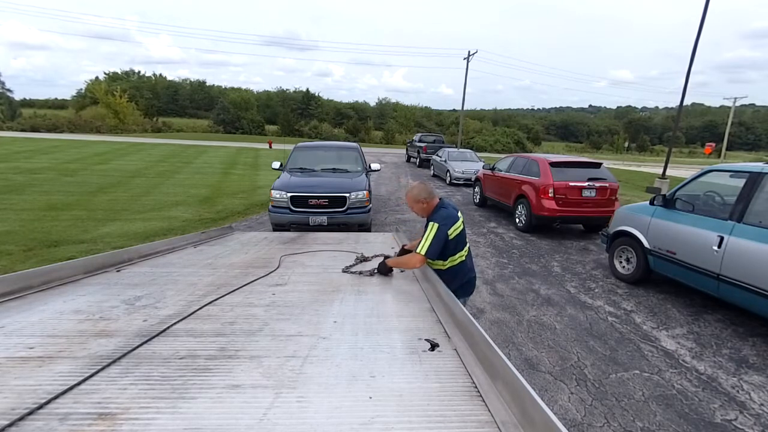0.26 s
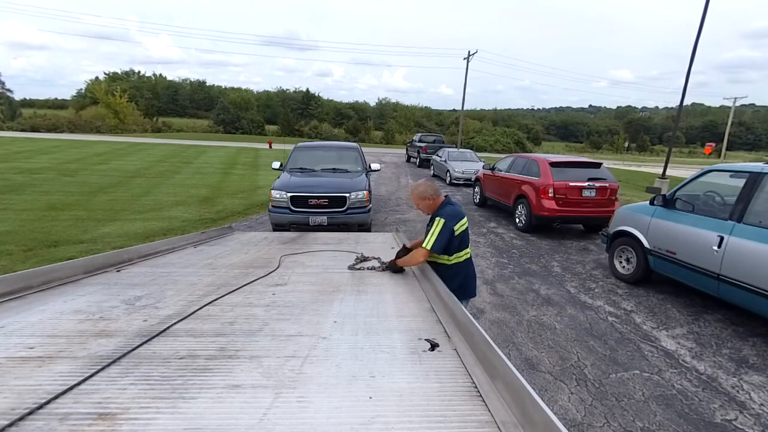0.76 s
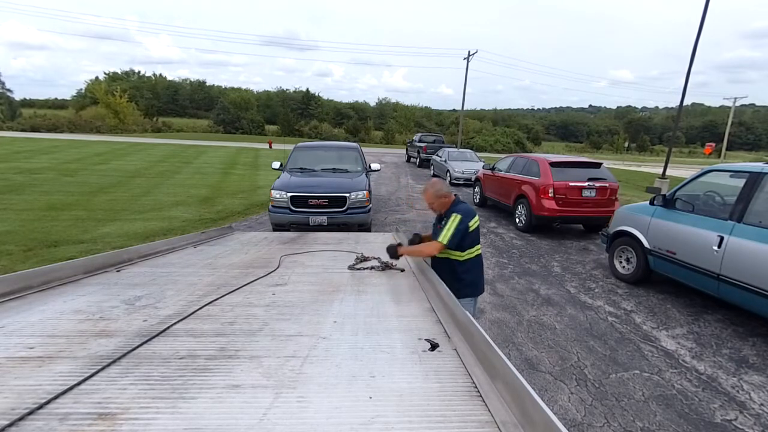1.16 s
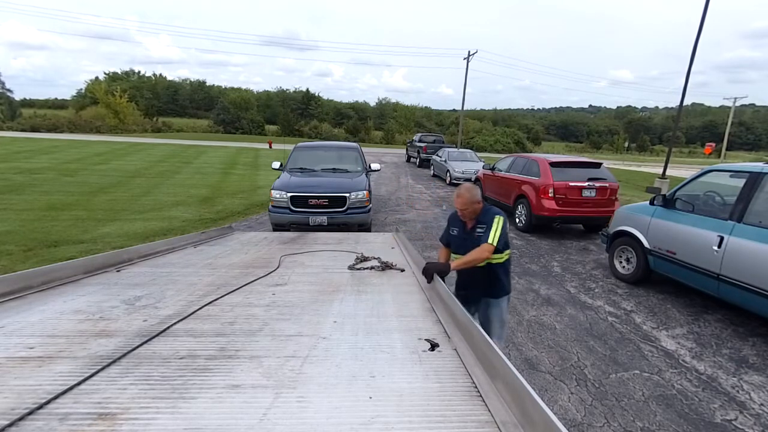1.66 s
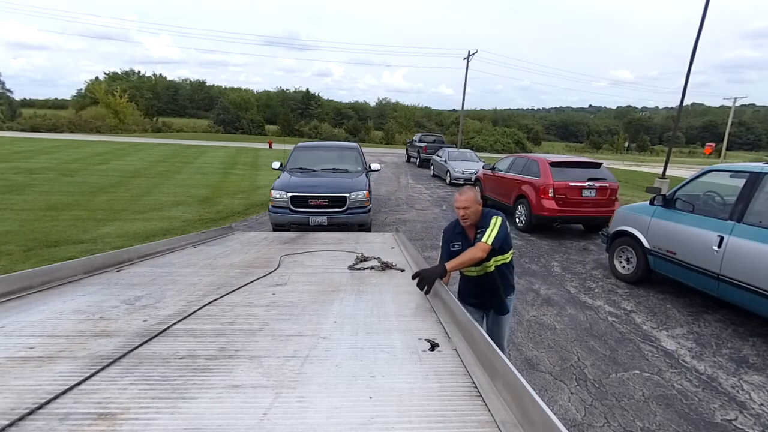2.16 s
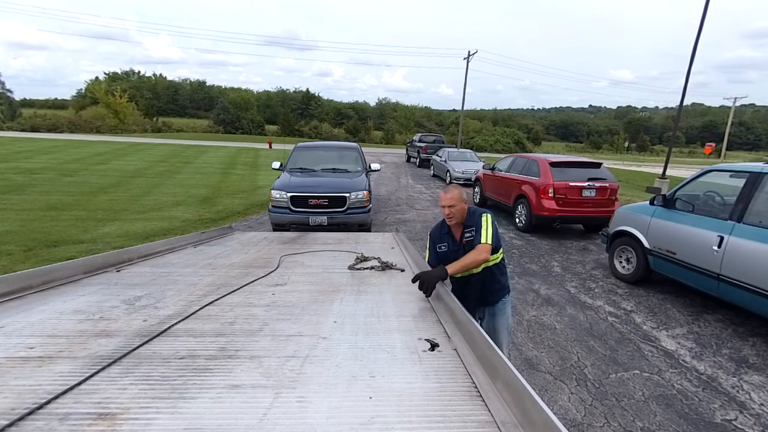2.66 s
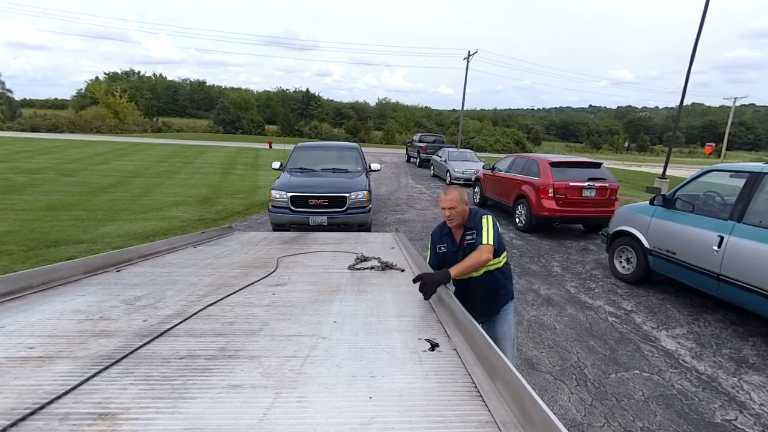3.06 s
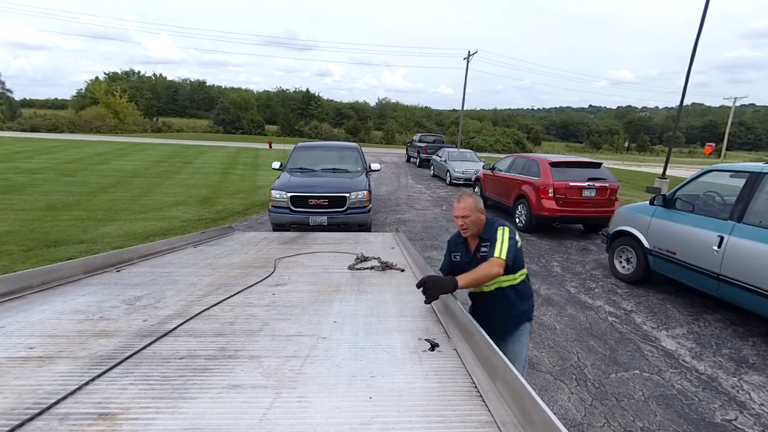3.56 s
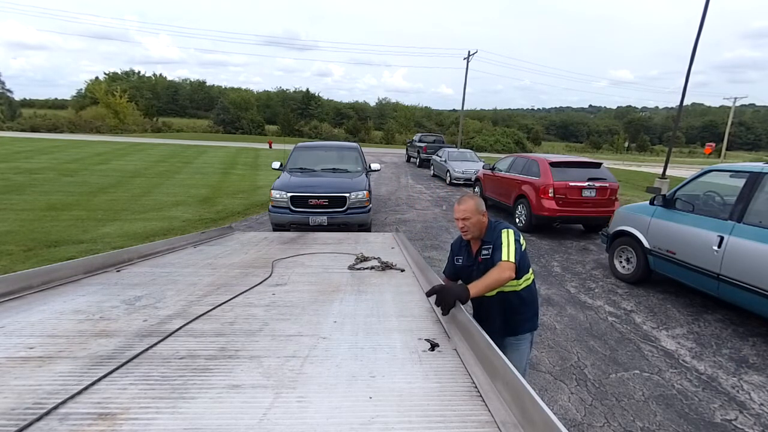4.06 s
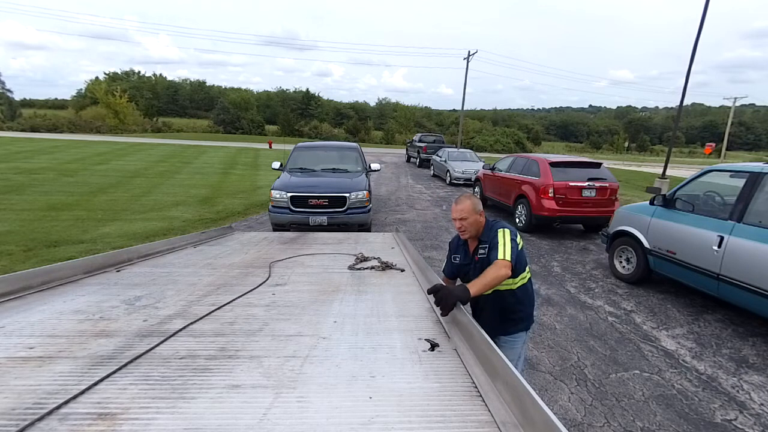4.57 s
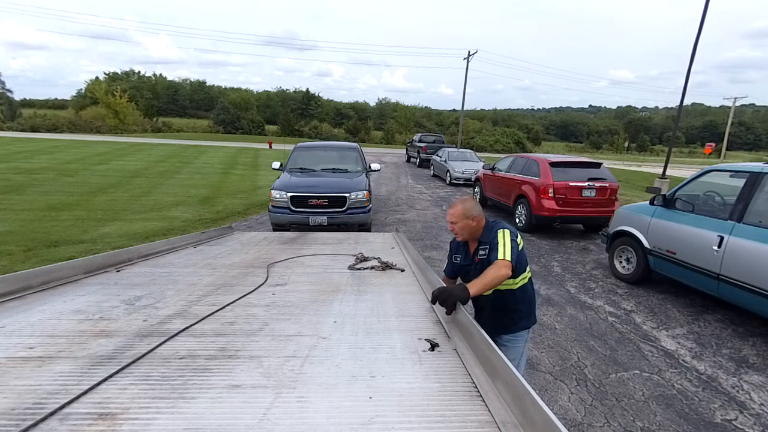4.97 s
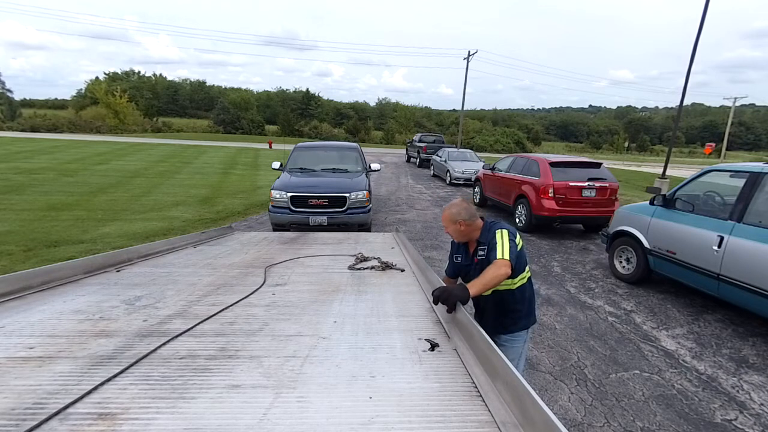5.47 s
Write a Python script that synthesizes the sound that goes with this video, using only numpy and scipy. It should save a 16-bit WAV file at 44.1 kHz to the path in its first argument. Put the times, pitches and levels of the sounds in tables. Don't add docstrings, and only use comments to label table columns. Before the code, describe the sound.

Chain links scrape and knock on ringing metal plate, a faint idle follows, then a grinding, whining winch drags cable that snags over ribs.

```python
import sys
import numpy as np
from scipy import signal
from scipy.fft import rfft, irfft, next_fast_len
from scipy.io import wavfile
from scipy.ndimage import uniform_filter1d, map_coordinates

SR = 44100
rng = np.random.default_rng(int(sys.argv[2]) if len(sys.argv) > 2 else 0)


def undo_db(level):
    steps = np.asarray(level, float) / 20
    return 10 ** steps


def log_audio(samples):
    frames = np.atleast_2d(samples).T
    limited = np.clip(frames, -1, 1)
    pcm = np.round(limited * 32767).astype(np.int16)
    wavfile.write(sys.argv[1], SR, pcm)


N = 251811
TIME = np.arange(N) / SR


def unit(x):
    return x / np.sqrt(np.mean(x ** 2) + 1e-20)


def along(points, hz):
    f, db = np.transpose(points)
    return undo_db(np.interp(np.log(hz + 1), np.log(f + 1), db, left=-120, right=-120))


def curves(rows):
    s, *columns = np.transpose(rows)
    return [np.interp(TIME, s, column) for column in columns]


def wobble(rate):
    knots = rng.standard_normal(int(N * rate / SR) + 4)
    return map_coordinates(knots, [np.arange(N) * rate / SR])


def filtered(x, response):
    m = next_fast_len(N + SR // 2)
    return irfft(rfft(x, m) * response(np.fft.rfftfreq(m, 1 / SR)), m)[:N]


def noise_through(response):
    return filtered(rng.standard_normal(N), response)


def hump(hz, spread):
    return lambda f: np.exp(-np.log((f + 1) / hz) ** 2 / spread)


def resonant(modes, f):
    total = 0
    for k, (centre, width, db) in enumerate(modes):
        damping = 1j * f * width
        total = total + (-1) ** k * undo_db(db) * damping / (centre * centre - f * f + damping)
    return total


def fine_modes(f, spacing_hz, depth_db):
    ripple = rng.standard_normal(int(SR / 2 / spacing_hz) + 4)
    return undo_db(depth_db * map_coordinates(ripple, [f / spacing_hz]))


def grit(per_s, spread_db, smooth):
    sizes = undo_db(spread_db * rng.uniform(-1.2, 1, N)) * np.sign(rng.standard_normal(N))
    contacts = (rng.random(N) < per_s / SR) * sizes
    return unit(unit(contacts) + smooth * rng.standard_normal(N))


def add(track, s, sound):
    part = track[round(s * SR):][:len(sound)]
    part += sound[:len(part)]


# time in seconds, gear noise level in dB.
EFFORT_CURVE = [
    (2.46, -66),
    (2.5, -53.5),
    (2.55, -40.5),
    (2.75, -39),
    (3.1, -42.5),
    (3.5, -42.5),
    (4.75, -42),
    (5.2, -39.5),
    (5.71, -39.5),
]


def winch():
    lines, turns = whine()
    gears_db, = curves(EFFORT_CURVE)
    grinding = undo_db(gears_db + 0.21 * wobble(9.5)) * gears(turns)
    running = np.arange(N) > EFFORT_CURVE[0][0] * SR
    return running * (lines + grinding + cable()) + snags()


# time in seconds, pump pulses per second.
PUMP_SPEED = [(2.5, 85), (2.53, 108), (2.555, 117.5), (2.6, 117.8), (2.625, 112.8), (2.71, 112.3),
              (2.77, 108.3), (2.85, 107.5), (2.88, 99), (2.91, 95.8), (2.95, 97.6), (3, 100.65),
              (3.2, 101.45), (3.8, 104.5), (4.2, 105.65), (4.4, 106.1), (5, 107.15), (5.7, 107.45)]
# time in seconds, share from 0 to 1.
CABLE_TENSION = [
    (4.74, 0.07),
    (4.88, 1),
]
START_ORDERS = [13 / 6, 7, 9, 31 / 3, 15, 15, 15, 8, 28, 34, 35]
# speed in pulses/s, width in pulses/s, level in dB.
START_CROSSINGS = [(93.6, 3, -58), (117.1, 2.6, -50.5), (117.5, 1.5, -49.5), (95.5, 3, -53),
                   (119, 0.91, -43.5), (112.5, 0.95, -45), (107.6, 0.21, -51), (113, 1.2, -50.5),
                   (97.5, 0.82, -54), (98.2, 0.77, -46), (93, 0.74, -60)]
RUN_ORDERS = [1, 2, 13 / 3, 6, 7, 7, 8, 10.5, 14, 46 / 3, 19, 20, 32, 34, 57, 14, 16, 17, 18, 22, 23, 28,
              33, 34, 37, 27, 28]
# speed in pulses/s, width in pulses/s, level in dB.
RUN_CROSSINGS = [(104.4, 3.7, -74), (104.54, 2.2, -66), (101.9, 2.4, -68.5), (104.4, 2.2, -62.5),
                 (103.3, 0.41, -49), (106.8, 1.4, -59.5), (102.6, 1.17, -48), (105.7, 0.4, -50),
                 (99.2, 2.9, -49), (104.6, 0.36, -49), (107, .8, -66), (103.16, 1.8, -49),
                 (104.7, 0.35, -57), (102.3, 0.58, -53.5), (107, 1.7, -62), (104.95, 0.24, -50.5),
                 (105.8, 1.1, -55), (100.5, 0.82, -74), (102, .5, -64), (108.5, 0.12, -63.5),
                 (100, .4, -57), (112, .6, -68), (103, 0.44, -58), (102, 0.53, -67), (108.5, 0.65, -57),
                 (100.6, 1.2, -60), (101.2, 1.9, -58)]
TAUT_ORDERS = [8, 9, 12, 13, 15, 16.5, 52 / 3, 22, 67 / 3, 27, 29, 50, 56, 63]
# speed in pulses/s, width in pulses/s, level in dB, gain in dB once taut.
TAUT_CROSSINGS = [(107.3, 0.26, -67, 10), (113, 5, -61.5, 10.5), (107.3, 2.4, -55.5, 10),
                  (106.3, 3.3, -49, 4), (106, 2.5, -56, 16), (107, 0.58, -55.5, 13),
                  (105.5, 1.7, -51.5, 4.5), (103, 4.6, -50, -25), (105.8, 2.6, -62, 11.5),
                  (106.1, 1.7, -54.5, -18), (106.6, 0.85, -48, -0.5), (109, 1.5, -71, 11.5),
                  (106, 2.5, -68, 4), (106.3, 0.39, -56, 10.5)]


def whine():
    (speed,), (taut,) = curves(PUMP_SPEED), curves(CABLE_TENSION)
    turns = np.cumsum(speed + 0.0412 * wobble(24.91)) / SR
    lines = np.zeros(N)
    on = slice(int(PUMP_SPEED[0][0] * SR) - SR // 20, N)
    t = TIME[on]
    coarse_t, coarse_speed, coarse_taut = t[::64], speed[on][::64], taut[on][::64]
    flutter_s = np.arange(0, N / SR + 0.1, 1 / 28)
    orders = START_ORDERS + RUN_ORDERS + TAUT_ORDERS
    crossings = [(*row, 0) for row in START_CROSSINGS + RUN_CROSSINGS] + TAUT_CROSSINGS
    phase = {order: rng.random() for order in orders}
    for order, (best, width, db, taut_db) in zip(orders, crossings):
        off_peak = np.abs((coarse_speed - best) / max(width, 0.05))
        swell = 1 / np.sqrt(1 + off_peak ** 3)
        flutter = np.interp(coarse_t, flutter_s, rng.standard_normal(len(flutter_s)))
        flutter_db = min(0.09 * order, 2.5) * flutter
        level = np.interp(t, coarse_t, undo_db(db + taut_db * coarse_taut + flutter_db) * swell)
        lines[on] += np.sqrt(2) * level * np.sin(2 * np.pi * (order * turns[on] + phase[order]))
    since = TIME - 2.56
    surge_db, surge_s, rise_db_per_s = 6.5, 0.7, 563.5
    load_db = -1.4 + surge_db * np.exp(-np.abs(since) / surge_s) + rise_db_per_s * np.minimum(since, 0)
    return undo_db(load_db) * lines, turns


# resonance in Hz, width in Hz, level in dB.
HOUSING_MODES = [(808, 25.6, -10), (890, 7.6, -19), (1100, 25, 0.5), (1284, 15, 6.5), (1446, 16, -9),
                 (1690, 16, -3), (1782, 31, 3), (2055, 41, -1), (2380, 330, -15), (2850, 37, -15),
                 (3101, 27, -3.5), (3348, 83, -2.5), (3540, 30, -18), (4080, 124, -16.5),
                 (4670, 136, -11.5), (6170, 29, -13.5), (6370, 69, -24.5), (6725, 28, -8.5),
                 (7080, 40, -29), (7620, 150, -15.5), (8520, 30, -22), (9920, 70, -32), (12300, 170, -20)]
COVER_HZ = [5560, 8280, 11010, 11390]
# width in Hz, level in dB.
COVER_WIDTHS = [(89.5, -16.5), (50, -25), (69, -18), (80, -13.5)]
# frequency in Hz, level in dB per Hz.
GEAR_COLOUR = [(35, -47), (60, -47), (216, -19), (272, -25), (548, -16), (814, 1.5), (1800, 3), (2860, -11),
               (3370, -11), (5240, -12.5), (6610, -7), (8950, -25.5), (11000, -15), (15600, -53)]


def gears(turns):
    beat = 1 + 0.14 * np.cos(2 * np.pi * turns) + 0.038 * np.cos(2 * np.pi * turns / 3)
    drive = beat * grit(6000, spread_db=7, smooth=1.45) + 0.24 * strokes(turns, count=24)
    drive = filtered(drive, lambda f: fine_modes(f, spacing_hz=21.73, depth_db=3.5))
    panels = HOUSING_MODES + [(hz, *row) for hz, row in zip(COVER_HZ, COVER_WIDTHS)]
    ringing = np.zeros(N)
    for k in range(2):
        half = unit(filtered(drive, lambda f: resonant(panels[k::2], f)))
        ringing += half * undo_db(0.9 * wobble(9))
    noise = unit(ringing) + 0.84 * unit(filtered(drive, lambda f: along(GEAR_COLOUR, f)))
    spin = np.clip((TIME - 2.5) / 0.21, 0, 1)
    treble = filtered(noise, lambda f: f ** 4 / (f ** 4 + 4900.0 ** 4))
    return unit(noise - (1 - spin) * treble)


def strokes(turns, count):
    phase = np.linspace(0, 1, 4097)
    shape = np.zeros(len(phase))
    for k in range(count, 3 * count):
        shape += undo_db(4.1 * rng.standard_normal()) * np.sin(2 * np.pi * (k * phase + rng.random()))
    return unit(np.interp(turns % 1, phase, shape))


# frequency in Hz, level in dB per Hz.
CABLE_COLOUR = [(1470, -38), (2500, -13), (2700, -0.5), (3400, 1), (5030, -8.5), (6880, -4), (8730, -11),
                (12900, -13.5), (15600, -54)]
# resonance in Hz, width in Hz, level in dB.
DECK_MODES = [(844, 34, -7.5), (877, 29, -3.5), (959, 30, -1.5), (1090, 54, 3.5), (1306, 100, 1),
              (2445, 150, -6.5), (3096, 170, -10)]


def cable():
    slide = grit(2000, spread_db=7.5, smooth=0.71) * undo_db(0.86 * wobble(30))
    strands = unit(filtered(slide, lambda f: along(CABLE_COLOUR, f)))
    deck = unit(filtered(slide, lambda f: resonant(DECK_MODES, f)))
    return undo_db(cable_level()) * (strands + undo_db(4) * deck)


def cable_level():
    taut, = curves(CABLE_TENSION)
    slack_end_s = 2.875
    slack_db = -47 + 300 * np.minimum(TIME - 2.59, 0)
    lull_db = 17 * np.exp(-np.abs(TIME - slack_end_s) / 0.12)
    creep_db = -53 - lull_db + 2.5 * taut
    return uniform_filter1d(np.where(TIME < slack_end_s, slack_db, creep_db), int(0.062 * SR) + 1)


# time in seconds, level in dB.
CABLE_SNAGS = [(2.6506, -33), (2.6691, -30), (2.689, -30), (2.703, -34), (2.7599, -27), (2.777, -26),
               (2.7933, -21.5), (2.81, -26), (2.822, -24), (2.841, -35), (4.9593, -39), (5.0475, -37),
               (5.067, -37), (5.0855, -28), (5.106, -25), (5.1602, -25), (5.1992, -28), (5.217, -29),
               (5.2371, -32), (5.2721, -28), (5.3464, -26), (5.4028, -30), (5.4322, -30), (5.4411, -27),
               (5.4871, -34), (5.5528, -24), (5.6077, -27), (5.66, -29)]


def snags():
    out, t = np.zeros(N), np.arange(SR // 12) / SR
    for s, db in CABLE_SNAGS:
        envelope = undo_db(db - 5 - 60 * t / 0.038) * (1 - np.exp(-t / 0.0014))
        add(out, s, envelope * rng.standard_normal(len(t)))
    return filtered(out, hump(6900, 0.08))


def chain():
    return scrape() + knocks() + boom() + clinks()


# frequency in Hz, level in dB per Hz.
SLIDE_COLOUR = [(150, -51), (260, -23.5), (688, -12.5), (964, 0), (1040, -1.5), (1210, -3), (1590, -6),
                (2600, -18.5), (3380, -46), (5720, -120)]
# frequency in Hz, level in dB per Hz.
RATTLE_COLOUR = [(1180, -23), (2000, -24), (2920, -3), (3780, -9.5), (4610, -8), (6730, -12.5),
                 (7590, -10.5), (9340, -21.5), (15600, -30)]
# resonance in Hz, width in Hz, level in dB.
BED_MODES = [(964, 54, -5), (1180, 60, -2), (1250, 50, -2.5), (1420, 54, -8), (2970, 100, -10.5),
             (3340, 44, -2), (3970, 89, -7.5), (4550, 50, -10.5), (5550, 150, -30), (5780, 36, -16)]
# time in seconds, bed rumble in dB, fade
# in dB per second (negative swells), rattle over the rumble in dB.
CHAIN_TUGS = [(0, -43.5, 73, -6), (.12, -50.5, -17, -2), (.228, -35, 60, -7), (.27, -40, 9, -6.5),
              (.49, -36.5, 15, -5.5), (.612, -39.5, 170, -4.5), (.675, -46.5, -30, -5.5),
              (.74, -55, 5, -12), (.755, -41.5, 43, -4.5), (.79, -43, 65, -13), (.87, -47, 59, -11)]


def scrape():
    bed_db, rattle_db = tugs()
    drive = grit(2500, spread_db=8.5, smooth=0.84) * undo_db(1.5 * wobble(39.82))

    def rumble_response(f):
        return along(SLIDE_COLOUR, f) * (1.1 + 0.59 * np.abs(resonant(BED_MODES, f)))

    def rattle_response(f):
        return along(RATTLE_COLOUR, f) * (0.14 + 1.5 * np.abs(resonant(BED_MODES, f)))

    bed = unit(filtered(drive, rumble_response))
    rattle = unit(filtered(drive, rattle_response))
    moving = np.arange(N) < 1.6 * SR
    return moving * undo_db(bed_db - 5) * (bed + undo_db(rattle_db) * rattle)


def tugs():
    s, db, fade, rattle_db = np.transpose(CHAIN_TUGS)
    now = np.maximum(np.searchsorted(s, TIME) - 1, 0)
    levels = np.array([db[now] - fade[now] * (TIME - s[now]), rattle_db[now]])
    return uniform_filter1d(levels, int(0.01 * SR) + 1, axis=1)


# time in seconds, level in dB, pitch in Hz, crack over it in dB.
LINK_KNOCKS = [(0.049, -42, 1100, -14), (0.124, -31.5, 1240, -16), (0.165, -41, 1280, -14),
               (0.19, -37, 1200, -8), (0.206, -35, 990, -14), (0.217, -41, 1220, 2),
               (0.226, -32, 1000, -12), (0.233, -28, 1230, -9), (0.249, -21, 1186, -20),
               (0.275, -30, 1230, -1), (0.296, -34, 1030, -7), (0.319, -47, 1230, -20),
               (0.342, -42, 1090, -19), (0.365, -25, 1236, -8), (0.39, -33, 1100, -2),
               (0.41, -34, 825, -14), (0.427, -27, 1230, -7), (0.456, -28, 1250, -8),
               (0.48, -25, 1190, -10), (0.5, -18.5, 893, -20), (0.52, -19.5, 1000, -15),
               (0.535, -31, 940, -19), (0.584, -27, 1230, -10), (0.615, -21, 1230, -19),
               (0.641, -25, 859, -23), (0.688, -38, 1230, -3), (0.711, -36, 1230, -20),
               (0.757, -29, 936, -13), (0.765, -28, 1390, -24), (0.777, -21, 958, -31),
               (0.814, -30.5, 965, -12), (0.838, -36, 1220, -30), (0.86, -27.5, 937, -16),
               (0.889, -31.5, 924, -12), (1.034, -52, 964, -2), (1.113, -48, 1090, 0),
               (1.183, -44, 1125, -13), (1.274, -45, 827, -20)]
# frequency in Hz, level in dB, time to fall 60 dB in seconds.
PLATE_RING = [(826, -11.5, 0.29), (958, -5.5, 0.25), (1230, -13.5, 0.6), (1390, -16, 0.4)]


def knocks():
    out, cracks, t = np.zeros(N), np.zeros(N), np.arange(SR // 3) / SR
    for s, db, hz, crack_db in LINK_KNOCKS:
        tone = np.sin(2 * np.pi * hz * t) + 0.23 * np.sin(2 * np.pi * 1.29 * hz * t)
        decay = undo_db(db - 13.5 - 60 * t / 0.087) + undo_db(db - 8 - 60 * t / 0.017)
        add(out, s, decay * (1 - np.exp(-t / 0.0018)) * tone)
        plate = np.zeros(len(t))
        for f, level, t60 in PLATE_RING:
            fall = undo_db(db - 17.5 + level + rng.normal(0, 4.7) - 60 * t / t60)
            plate += fall * np.sin(2 * np.pi * (f * rng.normal(1, 0.0078) * t + rng.random()))
        add(out, s, (1 - np.exp(-t / 0.0099)) * plate)
        burst = undo_db(db + crack_db + 1 - 60 * t / 0.057) * (1 - np.exp(-t / 0.0029))
        add(cracks, s, burst * rng.standard_normal(len(t)))
    return out + filtered(cracks, hump(4000, 0.32))


# time in seconds, level in dB, pitch in Hz.
BED_BOOM = [(0.0, -60, 215), (0.114, -75, 209.5), (0.242, -75, 181.4), (0.364, -72, 214.3),
            (0.49, -75, 158.5), (0.598, -63, 171), (0.634, -71, 211.5), (0.99, -74, 200),
            (1.05, -87, 212.5)]


def boom():
    boom_db, boom_hz = curves(BED_BOOM)
    tone = np.sin(2 * np.pi * np.cumsum(boom_hz) / SR)
    return undo_db(boom_db - 2 + 3 * wobble(28.8)) * tone * (np.arange(N) < BED_BOOM[-1][0] * SR)


# time in seconds, level in dB, pitch in Hz, seconds until damped.
LINK_CLINKS = [(.018, -58.5, 8060, 0.019), (.028, -63, 7360, 0.043), (.028, -65, 8300, 0.021),
               (0.136, -57.5, 8130, 0.011), (.137, -66, 7340, 0.014), (.165, -65, 4600, 0.026),
               (.194, -59, 7360, 0.022), (.298, -58, 8260, 0.023), (.31, -62, 7400, 0.027),
               (0.311, -47.5, 4590, 0.012), (0.3684, -46, 7330, 0.107), (.3676, -59, 8000, 0.012),
               (.39, -60, 8100, .025), (.445, -62, 8000, .03), (0.235, -52, 4600, 0.013),
               (.272, -57, 5550, 0.011), (.286, -60, 6100, 0.016), (.311, -65, 8900, .015),
               (.3656, -57, 5550, .01), (.39, -57, 5550, 0.025), (.453, -51, 5550, .01),
               (.517, -56, 5550, 0.009), (0.611, -58, 5450, .018), (.615, -65, 8400, .04),
               (0.376, -51, 4400, .05), (.4923, -59, 7340, .06), (.4923, -58, 8040, .065),
               (.531, -49.5, 7900, 0.01), (.5676, -56, 8200, 0.01), (.5651, -69, 14800, .06),
               (.612, -51, 5780, 0.014), (.6205, -66, 11500, 0.032), (.6604, -67, 14800, .025),
               (.68, -57.5, 8100, 0.016), (0.691, -53, 7510, 0.0068)]


def clinks():
    out, t = np.zeros(N), np.arange(SR // 3) / SR
    for s, db, hz, lasts in LINK_CLINKS:
        damped = np.clip((lasts - t) / 0.0031 + 1, 0, 1)
        add(out, s, undo_db(db - 60 * t / 1.1) * damped * (1 - np.exp(-t / 0.0014)) * chime(hz, t))
    return out


def chime(hz, t):
    near_hz = hz * (1 + 0.0227 * rng.standard_normal((3, 1)))
    neighbours = np.sin(2 * np.pi * near_hz * t).sum(axis=0) * undo_db(-60 * t / 0.11)
    return np.sin(2 * np.pi * hz * t) + 0.65 * neighbours


def echoes(x):
    t = np.arange(SR // 4) / SR
    tail = undo_db(-60 * t / 0.32) * rng.standard_normal(len(t))
    return signal.fftconvolve(x, tail / np.linalg.norm(tail))[:N]


# time in seconds, level in dB.
BOOT_THUDS = [(0.761, -51), (0.836, -63), (0.984, -49.5), (1.237, -61), (1.5, -65), (1.634, -63),
              (2.13, -61), (2.299, -81), (2.6, -61), (2.701, -54), (2.919, -54), (2.979, -49), (4.151, -62),
              (4.719, -53), (4.802, -50), (4.862, -49), (4.92, -54), (5.449, -58), (5.579, -49)]


def thuds():
    out, t = np.zeros(N), np.arange(SR // 3) / SR
    for s, db in BOOT_THUDS:
        envelope = undo_db(db + 14 - 60 * t / 0.13) * (1 - np.exp(-t / 0.0096))
        add(out, s, envelope * rng.standard_normal(len(t)))
    return filtered(out, hump(350, 1.1))


# time in seconds, level in dB.
IDLE_HUM = [
    (0.0, -60),
    (0.27, -49.5),
    (0.42, -45),
    (0.75, -55.5),
    (0.99, -61.5),
    (1.26, -64),
    (1.78, -66.5),
]


def yard():
    idle_db, = curves(IDLE_HUM)
    return truck(idle_db) + drone() + hiss(idle_db)


# frequency in Hz, level in dB per Hz.
YARD_COLOUR = [(25, -48), (115, -29), (160, -21), (298, -23), (471, -19), (510, -13.5), (728, -10),
               (874, -4.5), (1000, -8), (1230, -2.5), (1500, -10.5), (2100, -10), (2700, -7), (3400, -14.5),
               (6000, -22), (8000, -50)]
# frequency in Hz, level in dB.
SHAKEN_PARTS = [(900, -92), (1039, -86), (1114, -74), (1265, -82), (1712, -79.5), (1814, -82), (1900, -78),
                (2230, -86), (2530, -80.5), (2907, -83)]


def truck(idle_db):
    hum = unit(noise_through(lambda f: along(YARD_COLOUR, f))) * undo_db(0.55 * wobble(13))
    modes = [(hz, 12, db + 80) for hz, db in SHAKEN_PARTS]
    parts = unit(noise_through(lambda f: resonant(modes, f)))
    rumble = unit(noise_through(lambda f: resonant([(131, 150, 0)], f) ** 2))
    sway = undo_db(-88.5 - 19.5 * np.clip(TIME - 1.1, 0, 0.7))
    return undo_db(idle_db) * (hum + 0.52 * parts) + sway * rumble


# frequency in Hz, level in dB.
ENGINE_TONES = [(260, -91.5), (517, -82), (640, -89), (775, -91), (856, -77)]


def drone():
    out = np.zeros(N)
    for hz, db in ENGINE_TONES:
        out += undo_db(db + 2 + 0.87 * wobble(10)) * np.sin(2 * np.pi * hz * TIME + 0.25 * wobble(7.1))
    return out


# frequency in Hz, level in dB per Hz.
HISS_COLOUR = [(1500, -32), (3000, -13), (6000, -4), (15700, -7)]


def hiss(idle_db):
    lift_db = np.minimum(1.2 * (idle_db - IDLE_HUM[-1][1]), 5.5)
    return undo_db(-74.5 + lift_db) * unit(noise_through(lambda f: along(HISS_COLOUR, f)))


def scene():
    links = chain()
    return (winch() + links + undo_db(-5.5) * echoes(links) + thuds() + yard())[None]


def band_limit(x):
    return signal.sosfilt(signal.butter(12, 15800, fs=SR, output="sos"), x)


def record(dry):
    fade = np.clip((N - np.arange(N)) / (0.0005 * SR), 0, 1)
    return band_limit(dry * fade)


dry = scene()
out = record(dry)
log_audio(out)
```